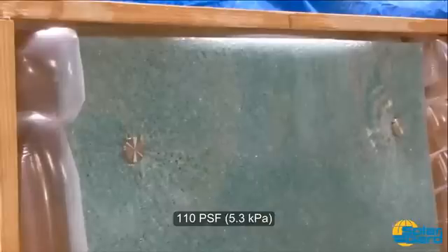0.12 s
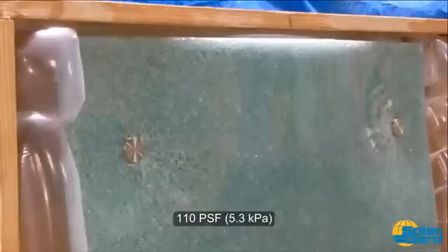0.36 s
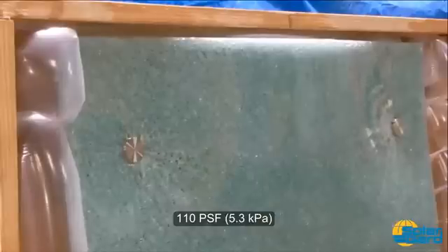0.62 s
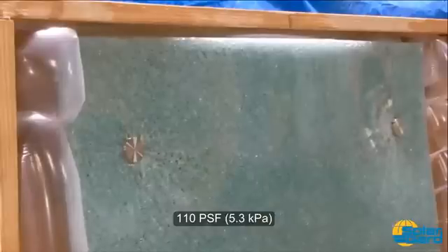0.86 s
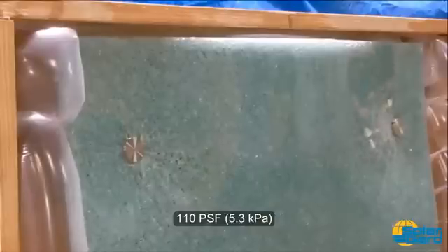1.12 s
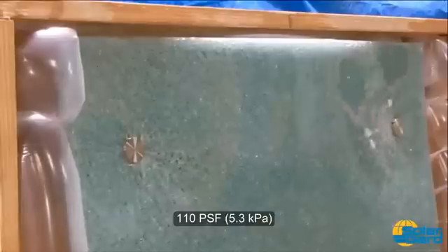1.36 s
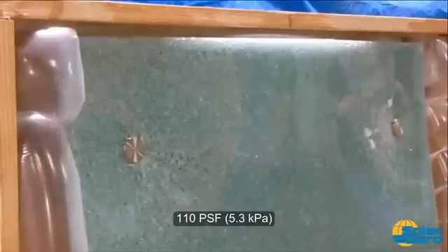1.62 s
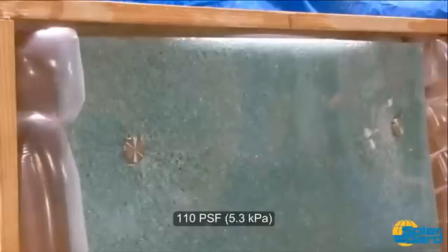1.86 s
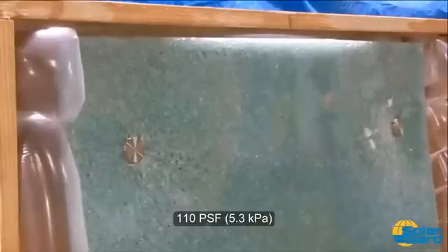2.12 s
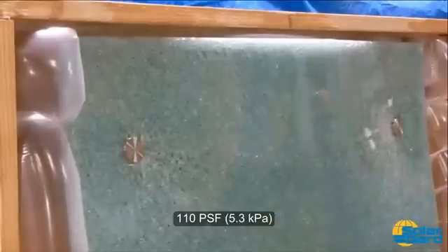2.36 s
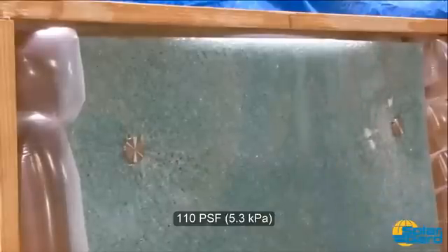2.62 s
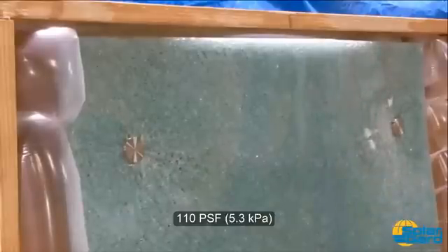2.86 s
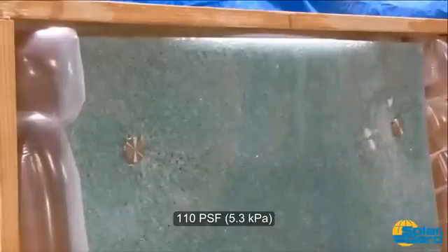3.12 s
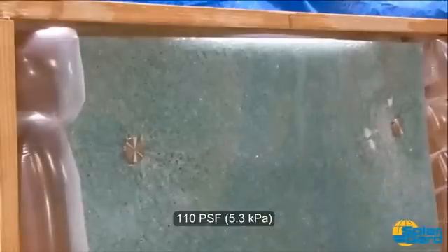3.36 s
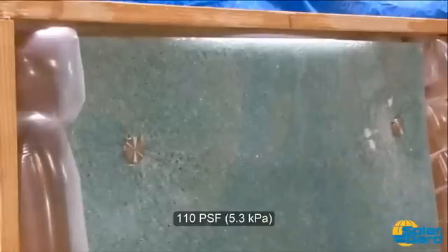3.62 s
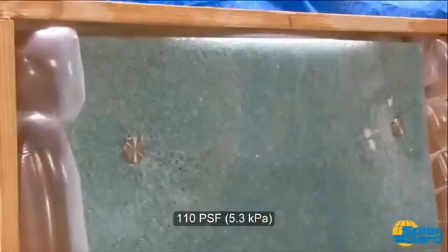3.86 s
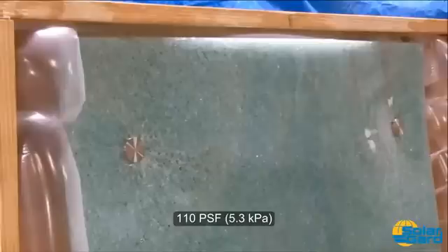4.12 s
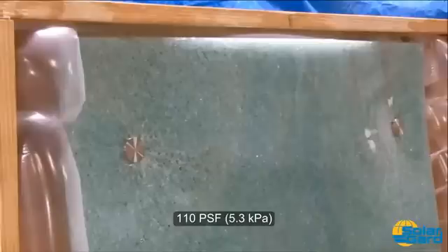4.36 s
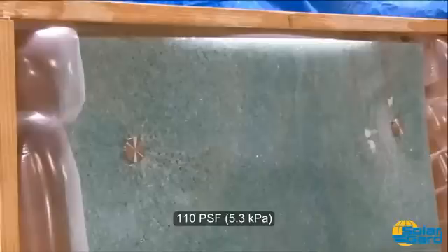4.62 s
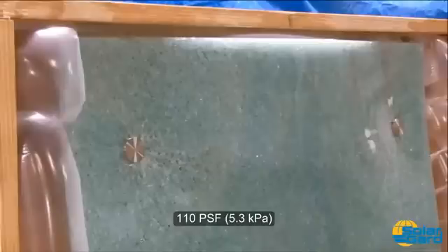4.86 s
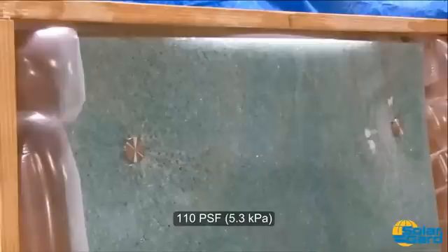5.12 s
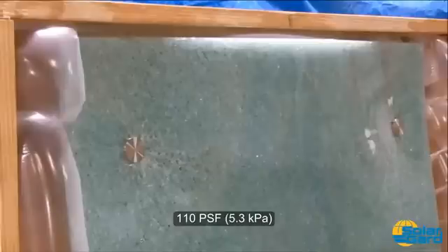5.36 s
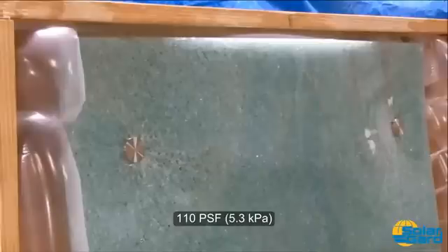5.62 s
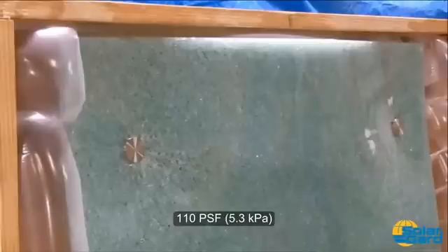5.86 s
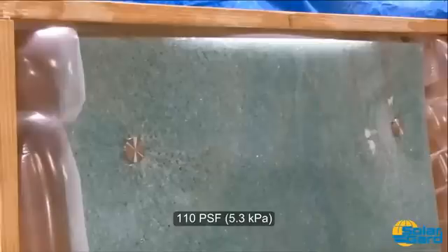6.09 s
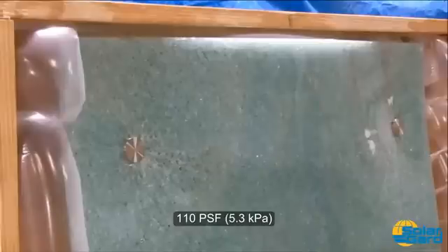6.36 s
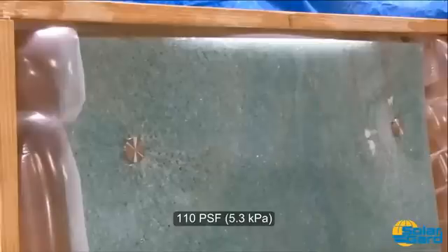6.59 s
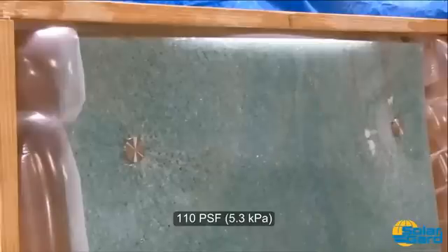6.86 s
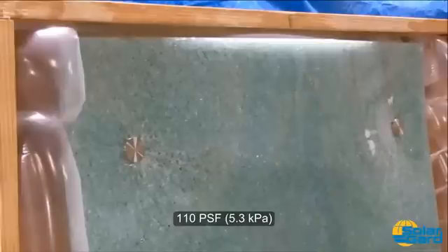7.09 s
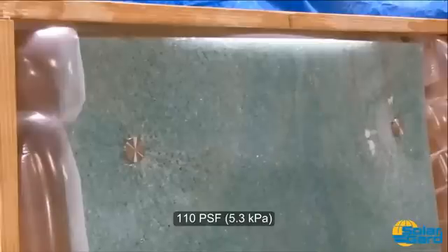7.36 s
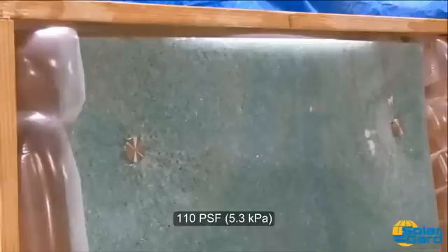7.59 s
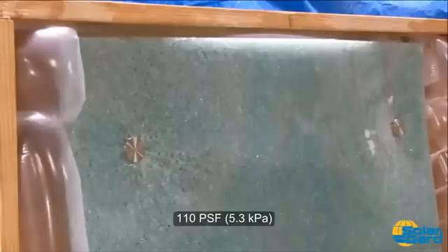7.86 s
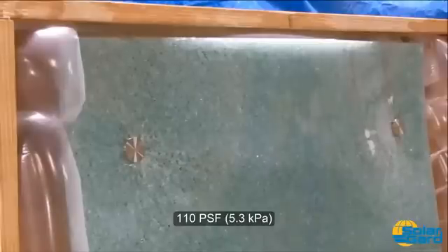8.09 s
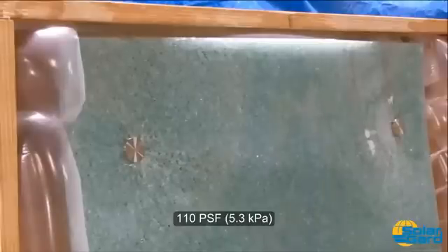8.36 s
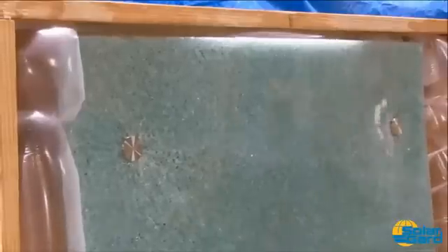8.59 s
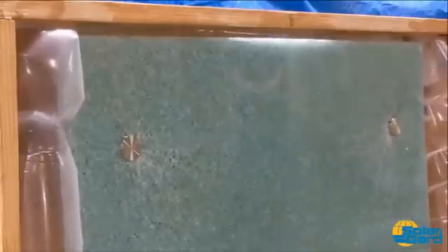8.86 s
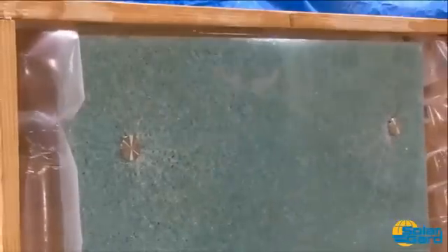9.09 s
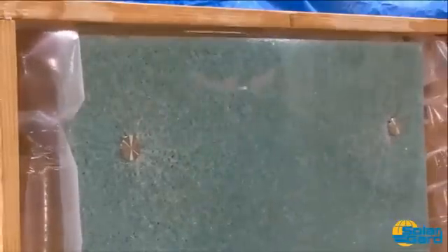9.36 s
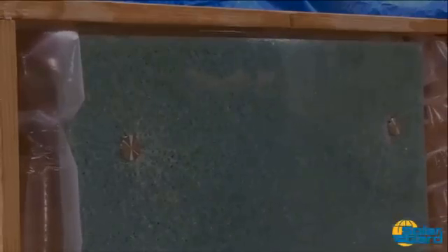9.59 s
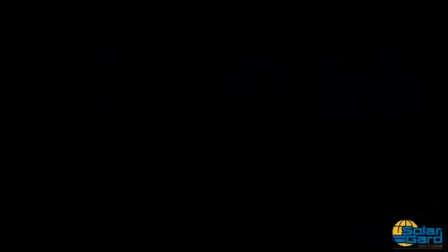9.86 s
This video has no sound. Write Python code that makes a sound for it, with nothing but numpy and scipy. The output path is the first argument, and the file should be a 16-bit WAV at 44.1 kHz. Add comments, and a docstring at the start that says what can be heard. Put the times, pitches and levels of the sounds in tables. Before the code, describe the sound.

Steady bright air rush and fine hiss with a blower whine over a low throbbing hum, then a quick vent, rundown and ticking plastic.

```python
"""A blower holds air pressure against a glass panel in a test bay: shaped noise for the duct's rush and the fine
leak hiss, a blurred sine for the blade whine, throbbing low noise for the motor, over the hum of the bay.
Then a valve vents with a whoosh of resonant noise, the blower runs down with rough whistles, the hiss dies,
plastic sheeting ticks in noise snaps as it slackens, and the hum dips and swells back."""
import sys
import numpy as np
from scipy import signal
from scipy.fft import rfft, irfft, next_fast_len
from scipy.io import wavfile
from scipy.ndimage import map_coordinates

SR = 44100
rng = np.random.default_rng(int(sys.argv[2]) if len(sys.argv) > 2 else 0)


def store_wav(level_fs):
    """Save 16-bit WAV to argv[1]."""
    pcm = np.round(np.clip(np.atleast_2d(level_fs), -1, 1) * 32767)
    wavfile.write(sys.argv[1], SR, pcm.T.astype(np.int16))


def amplitude_ratio(level_db):
    """Convert a level in decibels to the matching linear amplitude (field) ratio."""
    exponent = np.asarray(level_db, float) / 20
    return 10 ** exponent


N = 439677
SIZE = next_fast_len(N)
HZ = np.arange(SIZE // 2 + 1) * SR / SIZE + 1e-3
TIME = np.arange(N) / SR
TOP_HZ = 15640
COAST_S = 8.5  # the blower starts to coast
STIR_S = 9.62  # duct mode and upper bay noise rise again

# Left-right balance. Each row: frequency in Hz, left minus right in dB.
BALANCE = [(25, -1), (60, -7), (110, -8.5), (200, -8), (380, -4), (700, .5), (1300, 0), (15000, -.2)]
# Course of the bay's hum. Each row: time in seconds, nominal level in dB.
HUM_COURSE = [(0.0, -49.5), (0.69, -46), (1.39, -49), (1.56, -43.5), (1.66, -48.5), (3.03, -46),
              (3.13, -43), (3.33, -52), (3.66, -43.5), (3.72, -50.5), (4.53, -46.5), (7.22, -51),
              (7.3, -46.5), (8.44, -52), (8.55, -48.5), (9.24, -59.5), (9.44, -43.5), (9.77, -43.5),
              (9.89, -38), (9.97, -43)]
HUM_MEAN_DB = -47


def shape(points):
    """Gain at every frequency from (Hz, dB) points."""
    hz, db = np.transpose(points)
    return amplitude_ratio(np.interp(np.log(HZ), np.log(hz), db))


def peaks(modes):
    """Gain at every frequency of (Hz, width in Hz, dB) resonances, summed in power."""
    power = sum(amplitude_ratio(db) ** 2 / (1 + (2 * (HZ - hz) / width) ** 2) ** 2 for hz, width, db in modes)
    return np.sqrt(power)


def curves(table):
    """Each column of a table, after its time column, at every sample."""
    s, *columns = np.transpose(table)
    return [np.interp(TIME, s, c) for c in columns]


def after(s, rise_s):
    """Ramp from 0 to 1 that starts at s."""
    return np.clip((TIME - s) / rise_s, 0, 1)


def unit(x):
    """Scale to rms 1 in the mean of the channels."""
    return x / np.sqrt(np.mean(np.mean(np.atleast_2d(x), 0) ** 2))


def walk(rate_hz):
    """Random levels joined smoothly, about rate_hz a second; spread near 1."""
    knots = rng.standard_normal(int(N / SR * rate_hz) + 3)
    return map_coordinates(knots, [TIME[::64] * rate_hz], order=3).repeat(64)[:N]


def air(gain, lo_hz, hi_hz, shared_db, own_db, rate_hz, wide_db=0):
    """Noise for two microphones in half-octave bands that flicker together and alone."""
    # Each row: frequency in Hz, radians by which the left microphone leads.
    lead = [(5500, 0.034), (8200, 0.057), (15600, 0.98)]
    # Each row: frequency in Hz, nominal level of the unshared part in dB.
    spread = [(25, -14), (60, -10), (300, -13), (700, -20), (1150, -18), (1500, -22), (2400, -19),
              (4400, -13.5), (8000, -5.5), (15000, -6.5)]
    mid, apart = rfft(rng.standard_normal((2, SIZE))) * gain
    lean = np.sqrt(shape(BALANCE)) * np.exp(.5j * np.interp(HZ, *np.transpose(lead)))
    apart = apart * np.minimum(shape(spread) * amplitude_ratio(wide_db), .6)
    pair = np.array([(mid + apart) * lean, (mid - apart) / lean])
    shared_flicker_db = shared_db * walk(rate_hz)
    out = 0
    for hz in lo_hz * 2 ** np.arange(0, np.log2(hi_hz / lo_hz), .5):
        band = np.cos(np.pi / 2 * np.clip(2 * np.log2(HZ / hz), -1, 1)) ** 2
        flicker_db = shared_flicker_db + own_db * walk(rate_hz)
        out = out + irfft(pair * band, SIZE)[:, :N] * amplitude_ratio(flicker_db)
    return unit(out)


def tones(table, flicker_db, rate_hz):
    """Thin sines that wander a little in pitch and flicker in strength."""
    out = 0
    for hz, wander_hz, db in table:
        lean = np.sqrt(shape(BALANCE)[int(hz * SIZE / SR)])
        phase = 2 * np.pi * np.cumsum(hz + wander_hz * walk(12)) / SR
        tone = np.sin(phase) * amplitude_ratio(db + flicker_db * walk(rate_hz))
        out = out + np.array([[lean], [1 / lean]]) * tone
    return out


def rush(surge_db, down_db, gust_db):
    """Broad flow noise, raised at the duct's resonances and notched; its lower part surges more."""
    # Each row: frequency in Hz, relative density in dB per Hz.
    colour = [(900, -56), (1500, -16.5), (1650, -11.5), (1800, -1.5), (2200, -3), (2900, -1), (3200, 0.5),
              (3750, -1.5), (4600, -1), (6500, -2), (8000, -7), (10400, -26), (17000, -100)]
    # Duct resonances. Each row: frequency in Hz, width in Hz, relative level in dB.
    resonances = [(2770, 120, -3), (2950, 30, -4), (3069, 30, 0), (3125, 60, 0), (3210, 25, -1),
                  (3400, 90, 0), (3540, 50, -2), (3620, 40, -4), (3900, 40, -2), (4176, 22, 0),
                  (4360, 50, -2), (4485, 60, 0), (4749, 60, -1), (4964, 40, -2), (5170, 30, -4),
                  (5346, 70, -1), (5600, 50, -4), (5906, 16, 1), (6755, 65, -3)]
    # Duct notches. Each row: frequency in Hz, width in Hz, share of the rush removed (0-1).
    notches = [(2846, 56, 0.46), (3314, 84, 0.5), (3690, 54, .4), (5450, 50, 0.3)]
    duct = np.sqrt(1 + (amplitude_ratio(3.5) * peaks(resonances)) ** 2)
    duct = duct * (1 - sum(cut * peaks([(hz, width, 0)]) for hz, width, cut in notches))
    flow = air(shape(colour) * duct, 1000, 10000, .15, .7, 36)
    low = signal.sosfiltfilt(signal.butter(4, 3000, fs=SR, output="sos"), flow)
    low_db = 0.2 * surge_db * (1.5 - after(COAST_S, 0.042))
    flow = flow + (amplitude_ratio(low_db) - 1) * low
    rush_db = -31 + 0.15 * surge_db + down_db + 0.26 * walk(3.99)
    return amplitude_ratio(rush_db + gust_db) * flow


def crackle(rate_hz, spread_db):
    """Gain that spits briefly at random moments, as eddies break at the leak."""
    decay_s = 0.00065
    spikes = (rng.random(N) < rate_hz / SR) * amplitude_ratio(spread_db * rng.exponential(size=N))
    return 1 + signal.lfilter([1], [1, -np.exp(-1 / (decay_s * SR))], spikes)


def leak(surge_db, down_db, gust_db):
    """Fine treble noise of the leak, spitting at random; it sputters as it dies."""
    # Each row: frequency in Hz, relative density in dB per Hz.
    colour = [(2400, -60), (4000, -50), (5400, -22), (6200, -16), (7000, -10), (8300, -4.5), (9000, -2.5),
              (11700, -4.5), (14000, -3.5), (16000, -5.5)]
    sputter_db = 1.8 * after(COAST_S, 0.37) * walk(45)
    leak_db = -31 + 0.04 * surge_db + down_db + 0.19 * walk(4.0) + sputter_db
    hiss = air(shape(colour), 3620, 17000, 0.11, 0.39, 24)
    hiss = hiss * crackle(25 + 70 * after(COAST_S, 0.3), 0.87)
    return amplitude_ratio(leak_db + gust_db) * unit(hiss)


def duct_mode(surge_db, rush_down_db):
    """Restless low resonances of the duct, following the surge; they stir again near the end."""
    # Each row: frequency in Hz, width in Hz, relative level in dB.
    low_modes = [(1140, 13, -10), (1180, 13, 3), (1334, 335, 6)]
    mode_db = -47.6 + surge_db + 0.78 * rush_down_db + 2.2 * walk(5.5) + 28.5 * after(STIR_S, .08)
    return amplitude_ratio(mode_db) * air(peaks(low_modes), 730, 2900, 1.8, 2.1, 18)


def airflow():
    """Rush, leak and low duct mode, driven by the same surging flow and its rundown."""
    # Surging of the flow. Each row: time in seconds, nominal level of the low duct mode in dB.
    surge_course = [(0.0, -57), (0.8, -48), (0.87, -55), (3.32, -51.5), (3.46, -62.5), (4.0, -53),
                    (4.09, -57.5), (4.92, -49.5), (4.99, -61), (6.26, -56.5), (6.31, -50.5), (6.92, -59.5),
                    (7.27, -49.5), (7.46, -64), (7.58, -54), (7.67, -58.5), (8.05, -53), (8.45, -61)]
    # Pressure let go. Each row: time in seconds, rush in dB, leak in dB, both against the held level.
    rundown = [(8.52, 3.5, 0), (8.58, -0.5, -6), (8.66, -6, -4.5), (8.74, -10.5, -2), (8.86, -13.5, -3),
               (8.91, -29, -6.5), (9.12, -31, -14), (9.25, -35, -31), (9.45, -27, -20), (9.6, -29, -24.5),
               (9.7, -24, -18), (9.89, -27, -21), (9.925, -20.5, -20)]
    surge_db = curves(surge_course)[0] + 47
    rush_down_db, leak_down_db = curves(rundown)
    gust_db = .5 * walk(34)  # eddies that shake rush and leak together
    flow = rush(surge_db, rush_down_db, gust_db) + leak(surge_db, leak_down_db, gust_db)
    return flow + duct_mode(surge_db, rush_down_db)


def whine():
    """Blade tone blurred by turbulence, with a rough second harmonic and a third lifted by a duct resonance."""
    # Each row: time in seconds, nominal pitch in Hz, nominal level in dB.
    blade_course = [(0, 2023, -47), (1.5, 2026, -45), (4.5, 2025, -44), (6.5, 2022, -44), (8, 2018, -55),
                    (8.45, 2010, -56), (8.55, 1945, -47), (8.595, 1920, -43), (8.635, 1910, -45),
                    (8.658, 1900, -57), (8.676, 1892, -47), (8.712, 1890, -42), (8.73, 1880, -54),
                    (8.745, 1872, -44), (8.81, 1860, -47), (8.83, 1855, -48), (8.86, 1845, -57),
                    (8.9, 1840, -78), (9.45, 1700, -80), (9.51, 1685, -64), (9.536, 1678, -50),
                    (9.553, 1675, -55), (9.578, 1670, -43), (9.605, 1664, -51), (9.628, 1662, -50),
                    (9.642, 1658, -61), (9.652, 1655, -49), (9.712, 1645, -49), (9.724, 1640, -54),
                    (9.742, 1632, -39), (9.79, 1620, -44), (9.803, 1615, -56), (9.822, 1612, -57),
                    (9.83, 1610, -45), (9.862, 1608, -39), (9.886, 1604, -51), (9.92, 1600, -54),
                    (9.934, 1600, -46), (9.955, 1592, -72)]
    hz, db = curves(blade_course)
    coast = after(COAST_S, .05)
    phase = 2 * np.pi * np.cumsum(hz + 1.5 * walk(12) + 7 * coast * walk(60)) / SR
    blur = 0
    for wave in (np.sin, np.cos):
        blur = blur + ((1 - coast) * walk(50) + coast * walk(130)) * wave(phase)
    blur = (.36 - .06 * coast) * blur  # quicker while coasting
    second = walk(110) * np.sin(2 * phase) + walk(110) * np.cos(2 * phase)
    third_gain = amplitude_ratio(-5) / (1 + ((3 * hz - 6076) / 150) ** 2)
    apart = (.2 + .05 * coast) * walk(12) * np.cos(phase)  # opposite in the two channels
    tone = np.sin(phase) + blur + amplitude_ratio(-21 - 3 * coast) * second + third_gain * np.sin(3 * phase)
    tone = tone + np.array([apart, -apart])
    return np.sqrt(2) * tone * amplitude_ratio(db + (1.5 - .9 * coast) * walk(25))


def whistles():
    """Short thin tones of the rundown, roughened by turbulence, soft at both ends."""
    # Each row: start in seconds, length in seconds, frequency in Hz, nominal level in dB.
    calls = [(8.655, .03, 2820, -49), (8.69, .015, 2940, -50), (8.78, .018, 1440, -46),
             (8.72, .09, 2840, -57), (8.815, 0.045, 2800, -52), (9.447, 0.12, 2790, -61),
             (9.54, .012, 3370, -60), (9.55, .12, 4174, -71), (9.64, .05, 1350, -54),
             (9.66, .19, 2783, -61), (9.705, .025, 2960, -55), (9.7, .03, 3300, -58),
             (9.75, .05, 3270, -58), (9.83, .04, 3300, -61), (9.86, .05, 2790, -57),
             (9.912, 0.02, 2810, -50), (9.9, 0.016, 1530, -43), (9.915, 0.03, 2440, -54),
             (9.922, .022, 1450, -51)]
    edge_s, blur = 0.006, 0.5
    out = 0
    for s, length_s, hz, db in calls:
        phase = 2 * np.pi * hz * TIME
        gate = after(s - edge_s, 2 * edge_s) * (1 - after(s + length_s - edge_s, 2 * edge_s))
        tone = (1 + blur * walk(110)) * np.sin(phase) + blur * walk(110) * np.cos(phase)
        out = out + amplitude_ratio(db) * gate * tone
    return np.sqrt(2) * out


def vent():
    """A short whoosh of noise through the valve's resonances, and a weaker puff; the valve seat chatters."""
    # Each row: frequency in Hz, width in Hz, relative level in dB, lag in seconds.
    resonances = [(570, 160, -12.5, 0.014), (730, 210, -5.5, 0.015), (1180, 270, 1, 0.0036),
                  (1720, 560, 0.5, -0.011), (2320, 1200, -3, 0.031)]
    # Each row: time of full flow in seconds, hold in seconds, relative level in dB.
    puffs = [(8.533, 0.023, -29.5), (8.748, 0.072, -53)]
    rise_db_s, fall_db_s = 400, 139

    def loss_db(s, hold_s):
        return rise_db_s * np.maximum(s - TIME, 0) + fall_db_s * np.maximum(TIME - s - hold_s, 0)

    out = 0
    for hz, width_hz, ring_db, lag_s in resonances:
        gain = sum(amplitude_ratio(db + ring_db - 5 - loss_db(s + lag_s, hold_s)) for s, hold_s, db in puffs)
        out = out + gain * air(peaks([(hz, width_hz, 0)]), hz / 2, hz * 2, .3, .6, 30, wide_db=5)
    return out * amplitude_ratio(3 * walk(130) - 1)


def ticks():
    """Slackening sheeting: each tick is one thin noise snap, a faint fizz after it and a duller knock under it."""
    # Each row: start in seconds, peak in dB, lower edge in Hz, gain of the knock in dB.
    snaps = [(8.813, -15, 7000, -35), (8.879, -24, 8000, -35), (8.9025, -24, 7000, -35),
             (8.9295, -24, 7000, -35), (8.9515, -24, 7000, -35), (8.965, -26, 10000, -35),
             (8.987, -25, 9000, -35), (9.0335, -23, 7000, -22), (9.0355, -23, 7000, -15),
             (9.057, -28, 11000, -35), (9.145, -32, 12000, -35), (9.151, -25, 8100, -24),
             (9.1535, -30, 8000, -9), (9.192, -31, 12000, -35), (9.262, -37, 12000, -30),
             (9.4595, -24, 9000, -30), (9.483, -34, 12000, -30), (9.518, -32, 11000, -30),
             (9.542, -32, 11500, -30), (9.685, -28, 8000, -23), (9.714, -33, 13000, -30),
             (9.741, -27, 8500, -30), (9.931, -28, 9000, -18), (9.939, -31, 11000, -25)]
    snap_s, fizz_s, fizz_db = .00015, .004, -10
    out, t = np.zeros((2, N + 1024)), np.arange(1024) / SR
    decay = np.exp(-t / snap_s) + amplitude_ratio(fizz_db) * np.exp(-t / fizz_s)
    knock_band = signal.butter(2, [1300, 6000], "band", fs=SR, output="sos")
    noises = rng.standard_normal((len(snaps), 3, len(t)))
    for (s, db, low_hz, knock_db), noise in zip(snaps, noises):
        pair = (noise[0] + .5 * noise[1:]) * decay + 4 * (t == 0)
        snap_band = signal.butter(4, [low_hz, TOP_HZ], "band", fs=SR, output="sos")
        tick = signal.sosfilt(snap_band, pair) + amplitude_ratio(knock_db) * signal.sosfilt(knock_band, pair)
        i = int(s * SR)
        out[:, i:i + len(t)] += amplitude_ratio(db) * tick / np.abs(tick.mean(0)).max()
    return out[:, :N]


def motor(swing_db):
    """Motor body: low resonant noise booming in steady throbs, sagging slowly and coming back up late."""
    # Each row: frequency in Hz, width in Hz, relative level in dB.
    body = [(51.7, 18, -16), (76, 14.5, -7.5), (101.4, 13, 0)]
    throb_hz, crest_s, throb_db, sag_db_s = 3.565, .08, 3.3, 0.52
    throb = np.cos(2 * np.pi * throb_hz * (TIME - crest_s))
    motor_db = -41 + 0.49 * swing_db - sag_db_s * TIME + throb_db * throb + 2.5 * after(9.35, 0.18)
    return amplitude_ratio(motor_db) * air(peaks(body) + amplitude_ratio(-16.0) * (HZ < 130), 24, 180, 0.44, 0.37, 5.4)


def bay_hum(hum_db):
    """Low noise coloured by the bay's standing waves, with steady machine tones."""
    # Each row: frequency in Hz, relative density in dB per Hz.
    colour = [(20, -22), (90, -44), (150, -7), (200, -11.5), (290, -11.5), (350, -14.5), (390, -23.5),
              (560, -49)]
    # Standing waves. Each row: frequency in Hz, width in Hz, level over the colour in dB.
    standing = [(130, 10, 6), (161, 10, 6), (188, 10, 2), (220, 10, 8), (252, 12, 7), (290, 12, 6),
                (350, 12, 6)]
    # Each row: frequency in Hz, pitch wander in Hz, nominal level against the hum course in dB.
    machines = [(130.8, 2.26, -6.5), (161.4, 1.95, -5), (221.6, 2.17, -16.5), (316.5, 0.3, -2.5)]
    hum = air(shape(colour) * np.hypot(1, peaks(standing)), 22, 400, .6, 1.1, 8)
    return amplitude_ratio(hum_db + 1.05 * walk(3.3)) * (amplitude_ratio(-1.5) * hum + tones(machines, 1.2, 6))


def bay_upper(swing_db):
    """Upper noise of the bay with thin high machine tones that come up late."""
    # Each row: frequency in Hz, relative density in dB per Hz.
    colour = [(350, -3.5), (500, 1.5), (640, 1), (760, -3.5), (950, -1.5), (1300, -8), (2000, -10),
              (3300, -12), (3900, -19), (6000, -27), (14000, -22), (16000, -24)]
    # Each row: frequency in Hz, width in Hz, level over the colour in dB.
    ring = [(3300, 91, -4), (6340, 130, 16)]
    # Each row: frequency in Hz, pitch wander in Hz, final nominal level against the upper noise in dB.
    machines = [(955, 15, -14), (6400, 40, -17), (7650, 6, -15), (13954, 6, -19), (14174, 6, -15)]
    upper = air(shape(colour) * np.hypot(1, peaks(ring)), 350, 17000, .6, 1.6, 16, wide_db=1)
    tones_db = -3.5 * (1 - after(9.42, .06))
    upper_db = -53 + 0.45 * swing_db + 1.5 * after(STIR_S, .08)
    return amplitude_ratio(upper_db) * (upper + amplitude_ratio(tones_db) * tones(machines, 4, 30))


def lows():
    """Motor and bay, all following the course of the hum."""
    hum_db, = curves(HUM_COURSE)
    swing_db = hum_db - HUM_MEAN_DB
    return motor(swing_db) + bay_hum(hum_db) + bay_upper(swing_db)


def scene():
    """All sources together; the air, whine and whistles drop at the very end."""
    fade = amplitude_ratio(-5 * after(9.942, .01))
    return (airflow() + whine() + whistles()) * fade + vent() + ticks() + lows()


def roll_off(x):
    """The treble ends steeply here."""
    return signal.sosfilt(signal.butter(12, 17000, fs=SR, output="sos"), x)


def record(dry):
    """The recorder cuts the top sharply with an elliptic low-pass."""
    cut = signal.sosfilt(signal.ellip(12, .3, 80, TOP_HZ, fs=SR, output="sos"), dry)
    return roll_off(cut)


dry = scene()
out = record(dry)
store_wav(out)
```